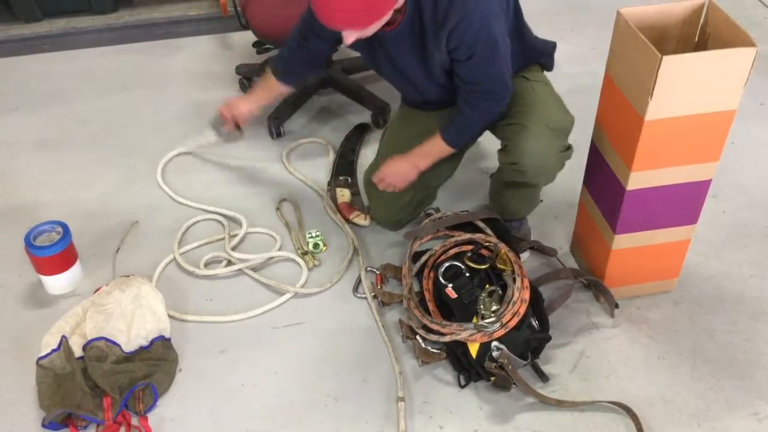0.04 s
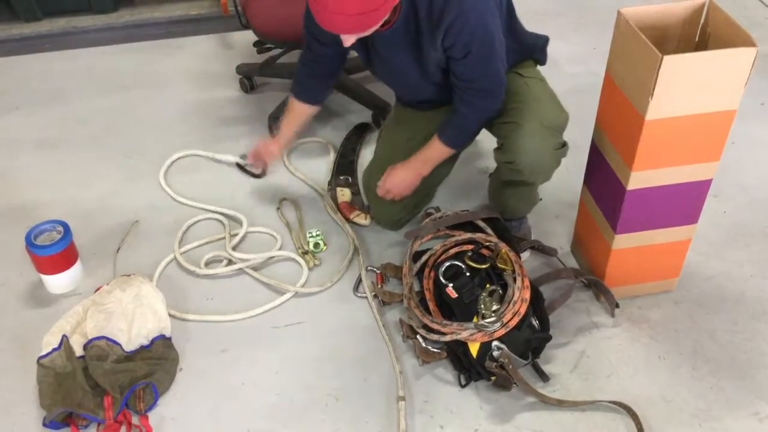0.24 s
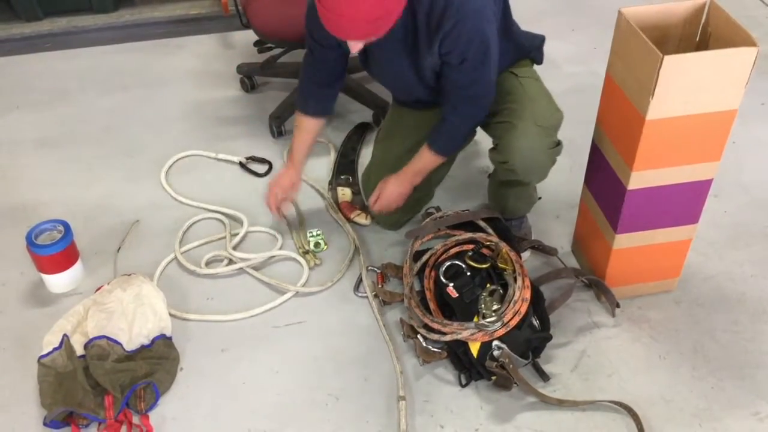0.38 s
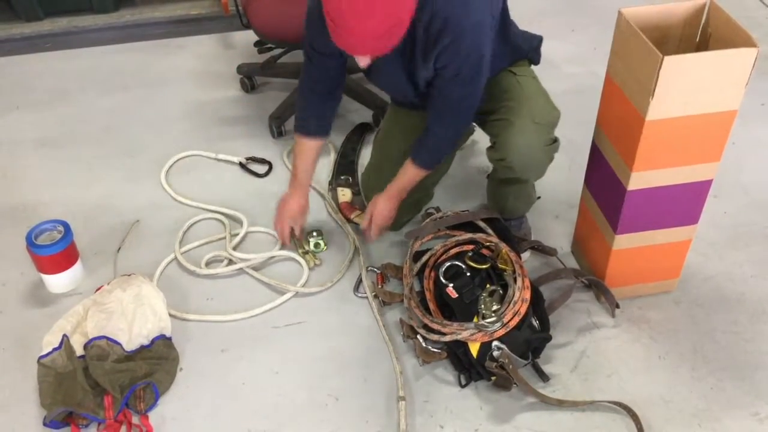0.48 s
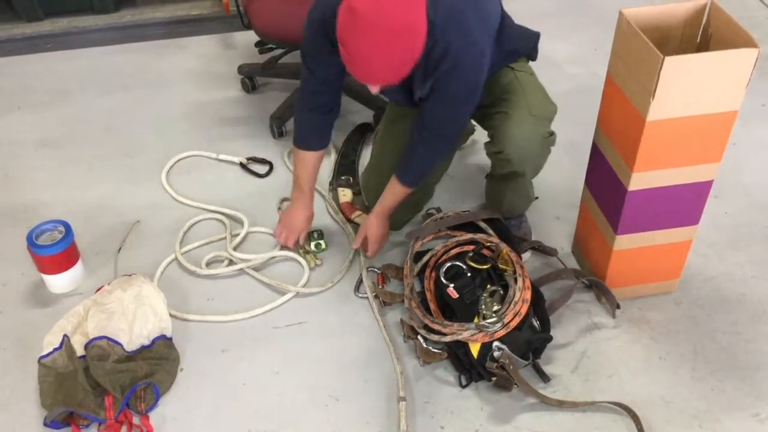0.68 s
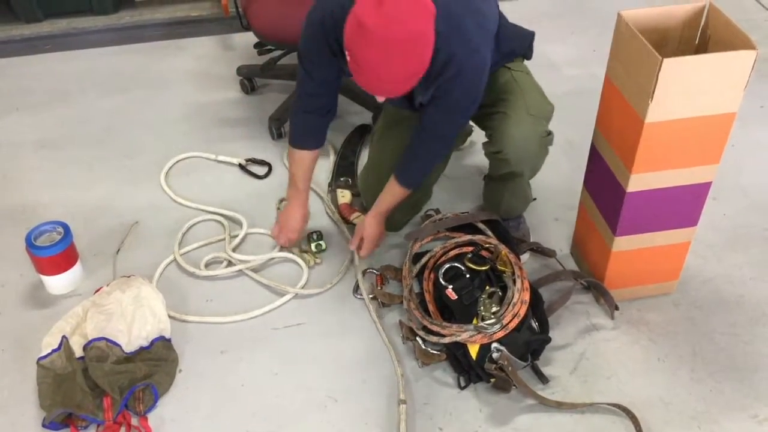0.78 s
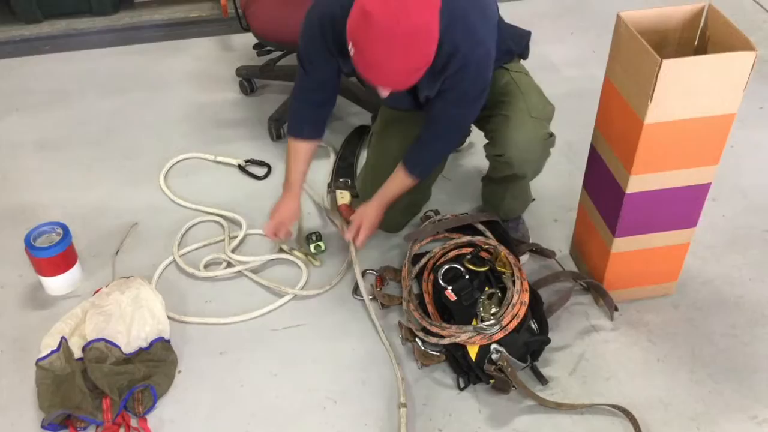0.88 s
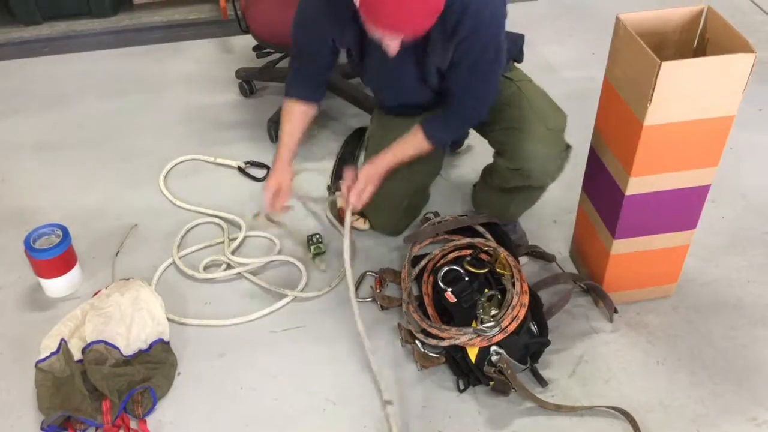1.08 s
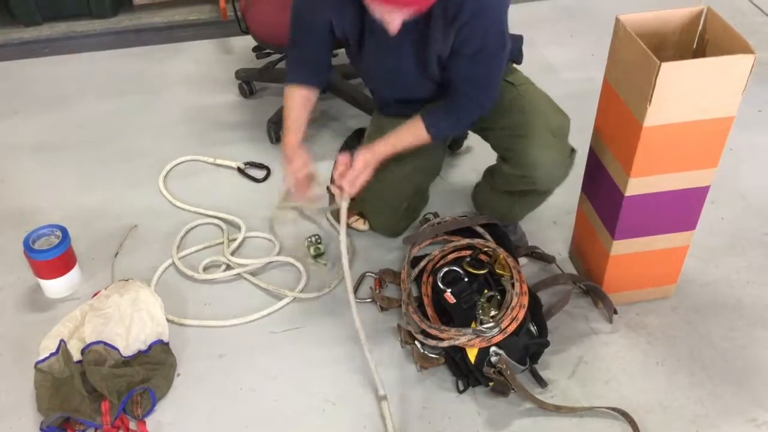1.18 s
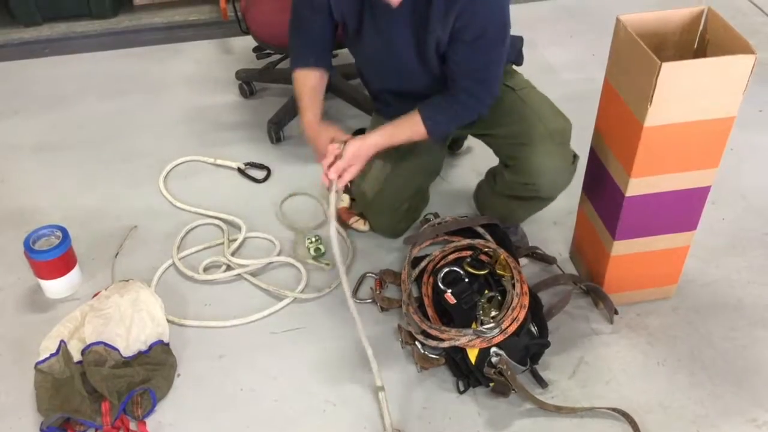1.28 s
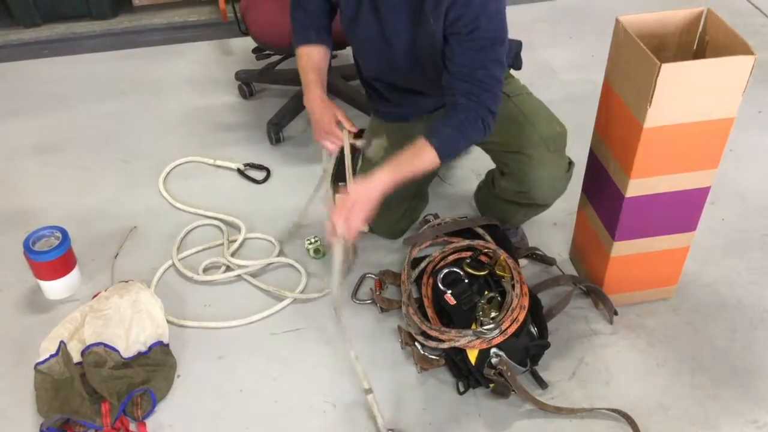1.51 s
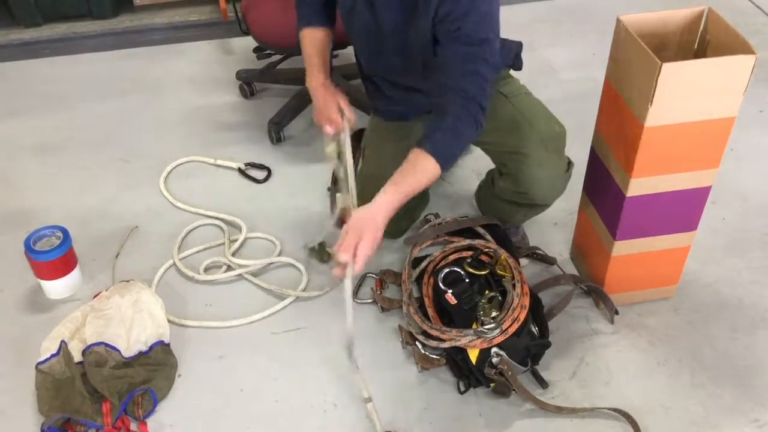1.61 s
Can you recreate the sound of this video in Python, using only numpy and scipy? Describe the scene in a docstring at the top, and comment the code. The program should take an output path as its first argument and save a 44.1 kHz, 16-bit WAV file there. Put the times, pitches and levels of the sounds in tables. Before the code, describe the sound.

A metal carabiner is set down on a concrete workshop floor with one short, bright clink. Rope and clothing then rustle faintly, with a few tiny metal tinkles, over a low ventilation rumble.

```python
"""A metal carabiner is laid down on the concrete floor of a workshop: it knocks, bounces and rings briefly.
Each touch excites the dry knock of the concrete and the bright modes of the metal, with a short room tail.
Rope slides through hands and over cloth as a faint, grainy rustle; hanging metal tinkles as it is lifted.
Cloth rubs softly as the body moves, and ventilation rumbles below with a thin whistle."""
import sys
import numpy as np
from scipy import signal
from scipy.fft import rfft, irfft
from scipy.io import wavfile

SR = 44100
rng = np.random.default_rng(int(sys.argv[2]) if len(sys.argv) > 2 else 0)


def transcribe(signal):
    """Save signal, clipped to [-1, 1], as a 16-bit WAV file at the path in sys.argv[1]."""
    frames = np.atleast_2d(signal).T
    limited = np.clip(frames, -1, 1)
    pcm = np.round(limited * 32767).astype(np.int16)
    wavfile.write(sys.argv[1], SR, pcm)


N = 72765


def from_db(db):
    """Decibels to gain."""
    return 10 ** (np.asarray(db) / 20)


def rms_one(x):
    """Scale to unit rms."""
    return x / np.sqrt(np.mean(x ** 2) + 1e-20)


def at_hz(curve, hz):
    """Read a curve on a log-frequency axis."""
    freqs, values = np.transpose(curve)
    return np.interp(np.log(hz), np.log(freqs), values)


def colour(noise, spectrum):
    """Shape noise with an EQ curve, at unit rms."""
    hz = np.maximum(np.arange(N // 2 + 1) * SR / N, 1)
    return rms_one(irfft(rfft(noise) * from_db(at_hz(spectrum, hz)), N))


def fader(curve):
    """Turn a level curve into a gain per sample."""
    times, db = np.transpose(curve)
    return from_db(np.interp(np.arange(N) / SR, times, db))


def drift(rate_hz):
    """Smooth random wander of unit rms, mostly slower than rate_hz."""
    hop, warm_up = 40, 2000
    pole = np.exp(-2 * np.pi * rate_hz * hop / SR)
    noise = rng.standard_normal(N // hop + warm_up + 2)
    slow = signal.lfilter([1], [1, -2 * pole, pole * pole], noise)[warm_up:]
    return np.interp(np.arange(N) / hop, np.arange(len(slow)), rms_one(slow))


def ring(x, hz, t60):
    """One resonance: a unit click starts a unit sine that falls 60 dB in t60 seconds."""
    decay, angle = from_db(-60 / (t60 * SR)), 2 * np.pi * hz / SR
    return signal.lfilter([0, np.sin(angle)], [1, -2 * decay * np.cos(angle), decay ** 2], x + 1e-18)


def ventilation(rumble_db=-52.5, swell_db=.69, whistle_hz=1775, whistle_width_hz=30):
    """A bed of gently swelling rumble, and a wavering whistle of noise in a narrow resonance."""
    # EQ of the low rumble and faint hiss, with the microphone's peak near 9 kHz: f/Hz, relative level/dB
    bed_eq = [(15, -51.5), (25, -31), (50, -9.5), (100, -3), (129, 2), (203, -7.5), (226, -12), (370, -13),
              (466, -29), (700, -29.5), (1800, -37.5), (5800, -47), (7600, -47.5), (9000, -43.5),
              (11000, -55), (12500, -62.5), (15300, -71.5)]
    # fader ride of the whistle: t/s, level/dB
    whistle_ride = [(0, -74.5), (.15, -90), (.55, -86.5), (.68, -82), (.79, -72.5), (.86, -93),
                    (.95, -73.5), (1.03, -102), (1.13, -76), (1.2, -92), (1.3, -73.5), (1.42, -85),
                    (1.57, -78.5), (1.65, -79)]
    rumble_gain = from_db(rumble_db + swell_db * drift(rate_hz=9))
    rumble = colour(rng.standard_normal(N), bed_eq)
    whistle_t60 = np.log(1000) / (np.pi * whistle_width_hz)
    whistle = rms_one(ring(rng.standard_normal(N), whistle_hz, whistle_t60))
    return rumble_gain * rumble + fader(whistle_ride) * whistle


def rope(grains_per_s=6700):
    """Sliding fibres make dense, tiny grains: a rustle that follows the handling."""
    # fader ride of the handling: t/s, level/dB
    rustle_ride = [(0, -88), (.042, -71), (.11, -87), (.18, -90), (.245, -65), (.32, -89), (.6, -97),
                   (.82, -86), (.885, -78), (.955, -81.5), (1.02, -76.5), (1.085, -78), (1.16, -75),
                   (1.23, -79.5), (1.35, -77), (1.43, -79), (1.54, -66.5), (1.65, -65)]
    # EQ of the rope rustle, with the microphone's bright peak near 9 kHz: f/Hz, relative level/dB
    rustle_eq = [(1500, -22), (2700, -13), (4300, -14), (7400, -5.5), (8300, 1.5), (9500, 6.5),
                 (11000, -1.5), (13000, -10), (15300, -12)]
    grains = rng.standard_normal(N) * (rng.random(N) < grains_per_s / SR)
    return fader(rustle_ride) * colour(grains, rustle_eq)


def cloth():
    """Cloth shifts as the body moves: a dull, soft rubbing."""
    # fader ride of the movement: t/s, level/dB
    rub_ride = [(0, -78), (.17, -80), (.23, -65), (.35, -73.5), (.54, -80), (.59, -70.5), (.68, -93),
                (.76, -77), (.9, -70.5), (1.0, -78), (1.12, -80), (1.19, -92), (1.27, -67.5), (1.36, -93),
                (1.44, -82), (1.56, -71), (1.65, -73)]
    # EQ of the cloth: f/Hz, relative level/dB
    rub_eq = [(300, -16), (550, 9), (900, -1), (1600, -7), (3000, -8.5), (6000, -25.5)]
    return fader(rub_ride) * colour(rng.standard_normal(N), rub_eq)


def strike(times, touch_db, modes, low_cut_hz, spread_db=3.5, contact_s=.0005):
    """Every touch excites every mode with its own strength, sign and tiny lag; the lows are rolled off."""
    shape = len(times), len(modes)
    scatter_db = spread_db * rng.standard_normal(shape)
    lags = contact_s * rng.random(shape)
    signs = rng.choice([-1, 1], shape)
    struck = np.zeros(N)
    for k, (hz, mode_db, t60) in enumerate(modes):
        clicks = np.zeros(N)
        onsets = ((times + lags[:, k]) * SR).astype(int)
        np.add.at(clicks, onsets, from_db(touch_db + mode_db + scatter_db[:, k]) * signs[:, k])
        struck += ring(clicks, hz, t60)
    return signal.sosfilt(signal.butter(3, low_cut_hz, "high", fs=SR, output="sos"), struck)


def carabiner():
    """Knock on the concrete plus the ring of the metal; both too small to radiate bass."""
    # the landing, its bounces and two faint later ticks: t/s, knock drive/dB, ring drive/dB
    touches = [(.2394, -34, -56), (.2413, -16, -20), (.2422, -21, -18), (.2433, -30, -28),
               (.2447, -29, -27), (.2463, -36, -18), (.2472, -38, -18), (.2502, -38, -26),
               (.2553, -38, -27), (.2598, -25, -29), (.2625, -40, -31), (.2653, -40, -32), (.869, -68, -64),
               (1.352, -70, -62)]
    # short, broad resonances of the knock: f/Hz, relative level/dB, t60/s
    knock_modes = [(800, -19, .006), (1650, -12, .005), (2100, -17, .003), (2700, -17, .0025),
                   (3500, -12, .0025), (4400, -7, .004), (5200, -9, .0025), (6000, -5, .003),
                   (6700, -5, .0035), (7600, -6, .003)]
    # modes of the carabiner: f/Hz, relative level/dB, t60/s
    metal_modes = [(6890, -23, .035), (7020, -23, .035), (8570, -8, .009), (8960, -8, .013),
                   (9230, -7, .016), (9600, -7, .011), (10000, -7, .008), (10300, -8, .008),
                   (10800, -14, .008), (11351, -19, .05), (12000, -20, .008), (12705, -21, .03),
                   (13900, -24, .015), (15180, -32, .02)]
    times, knock_db, ring_db = np.transpose(touches)
    knock = strike(times, knock_db, knock_modes, low_cut_hz=1250)
    ringing = strike(times, ring_db, metal_modes, low_cut_hz=5100)
    return knock + ringing


def room(x, wet_db=-9, predelay_s=.0029, rise_s=.002):
    """The workshop's diffuse tail: third-octave bands of noise, each dying at its own rate."""
    # decay of the room: f/Hz, t60/s
    decay_times = [(500, 0.31), (1320, 0.21), (3480, 0.42), (9190, 0.36)]
    # EQ of the tail: f/Hz, relative level/dB
    tail_eq = [(500, 1.5), (1300, 4.5), (2600, 3.5), (4100, 2), (6000, -2.5), (9400, -3), (12000, -9.5),
               (15000, -5.5)]
    t = np.arange(SR) / SR
    white, tail = rng.standard_normal((2, SR)), np.zeros(SR)
    edges_hz = 250 * 2 ** (np.arange(19) / 3)
    for k, (low, high) in enumerate(zip(edges_hz, edges_hz[1:])):
        hz = np.sqrt(low * high)
        bandpass = signal.butter(2, [low, high], "band", fs=SR, output="sos")
        band = signal.sosfilt(bandpass, white[k % 2])  # neighbouring bands get independent noise
        tail += band * from_db(at_hz(tail_eq, hz) - 60 * t / at_hz(decay_times, hz))
    tail *= 1 - np.exp(-t / rise_s)
    tail /= np.sqrt(np.sum(tail ** 2))
    response = np.concatenate([np.zeros(int(predelay_s * SR)), tail])
    return from_db(wet_db) * signal.fftconvolve(x, response)[:N]


def tinkles():
    """Hanging metal touches faintly while the rope is lifted, ringing in one mode each time."""
    # pings of the hanging metal: t/s, f/Hz, level/dB, t60/s
    pings = [(1.215, 7200, -77, .25), (1.225, 10300, -77, .15), (1.295, 10300, -74, .15),
             (1.375, 10300, -74, .15)]
    t, ringing = np.arange(N) / SR, np.zeros(N)
    for onset, hz, db, t60 in pings:
        envelope = (t > onset) * from_db(db - 60 * np.maximum(t - onset, 0) / t60)
        ringing += envelope * np.sin(2 * np.pi * hz * t)
    return ringing


def scene():
    """Mono mix: the metal with its room tail, over dry rope, cloth and ventilation."""
    metal = carabiner() + tinkles()
    return (metal + room(metal) + rope() + cloth() + ventilation())[None]


def record(dry):
    """A steep high cut takes off the very top."""
    cutoff_hz = 15280
    return signal.sosfilt(signal.ellip(12, .5, 70, cutoff_hz, fs=SR, output="sos"), dry)


dry = scene()
out = record(dry)
transcribe(out)
```